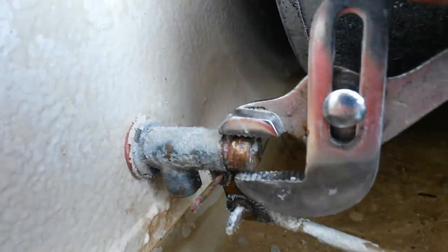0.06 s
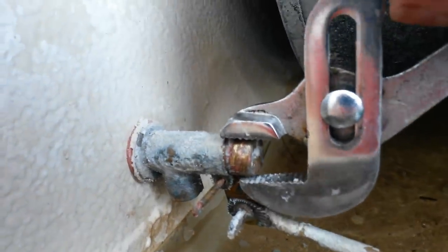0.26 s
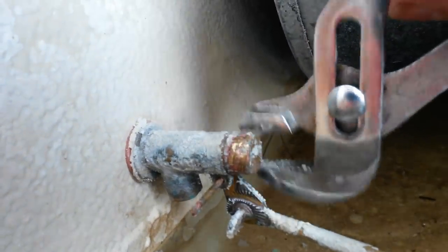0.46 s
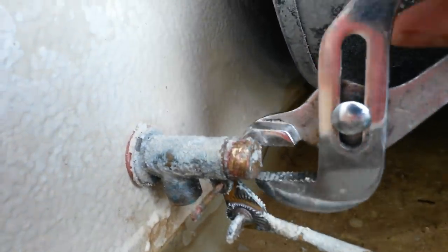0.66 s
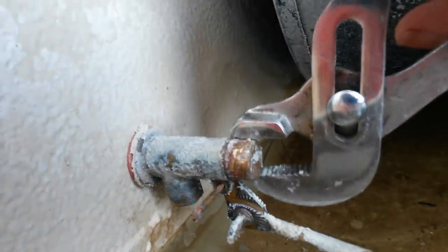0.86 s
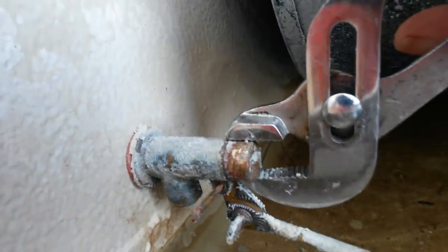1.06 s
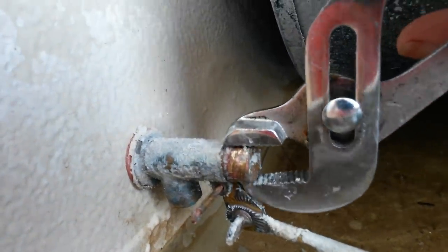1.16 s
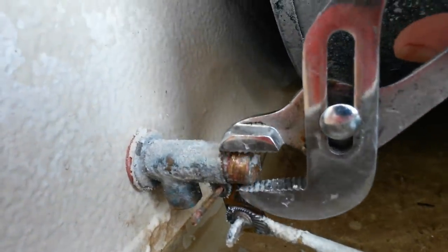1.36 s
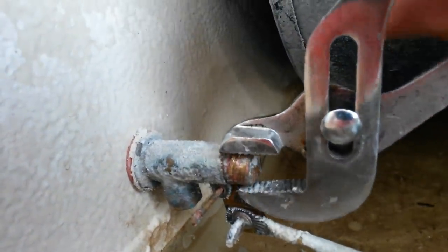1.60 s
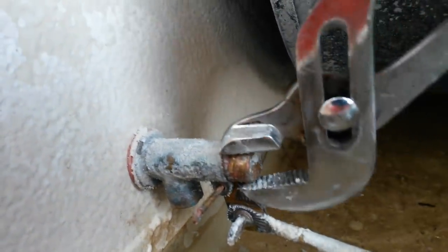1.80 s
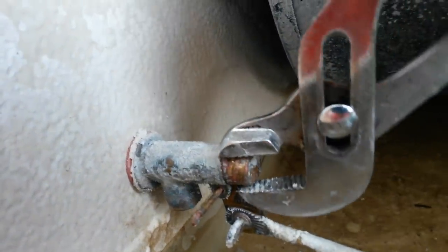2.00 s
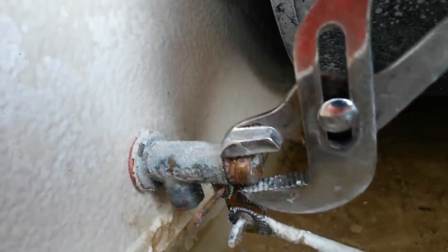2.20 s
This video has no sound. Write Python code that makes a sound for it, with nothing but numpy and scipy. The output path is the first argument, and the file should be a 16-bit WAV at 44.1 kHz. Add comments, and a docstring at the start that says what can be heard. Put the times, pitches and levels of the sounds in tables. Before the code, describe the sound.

Pliers knock on a corroded pipe fitting, close up. Light knocks at 0.2 and 0.4 seconds lead into a rumbling scrape, then two louder ringing clunks at 0.6 and 0.9 seconds, with a hollow boom. The teeth tick and grind over rust until about 1.6 seconds, ending in tiny squeaks. Duller knocks follow around 1.8 seconds, then a brief rumble. Low room noise lies underneath.

```python
"""Slip-joint pliers knock on a corroded pipe fitting, close up.
Each knock rings the steel, the pipe and the hollow body behind it, which booms on.
Between knocks the teeth tick, scrape and squeak over the rust; small slips under the grip
make the pipe judder and the body rumble. Low room noise and faint hiss lie underneath."""
import sys
import numpy as np
from scipy import signal
from scipy.fft import rfft, irfft, next_fast_len
from scipy.io import wavfile

SR = 44100
rng = np.random.default_rng(int(sys.argv[2]) if len(sys.argv) > 2 else 0)


def inscribe(sig):
    """Save sig as 16-bit PCM at rate SR to the path in sys.argv[1].

    A 1-D sig is mono; a 2-D sig holds one channel per row.
    Samples are clipped to [-1, 1] before scaling.
    """
    pcm = np.round(np.clip(np.atleast_2d(sig).T, -1, 1) * 32767)
    wavfile.write(sys.argv[1], SR, pcm.astype(np.int16))


N = 99225

# room noise: spectrum (f/Hz, gain/dB), envelope (t/s, level/dB)
ROOM_EQ = [(20, 1), (60, 23.5), (110, 27), (200, 13), (400, 10), (900, 2), (2000, -2.5), (3600, -3.5),
           (6500, -6.5), (10000, -6), (15000, -7)]
ROOM_ENV = [(0, -49), (.15, -57.5), (.35, -49.5), (1.2, -49.5), (1.7, -51), (2.25, -50)]
# modes of pipe with hollow body, and of the pliers (f/Hz, level/dB, t60/s, left minus right/dB)
PIPE_MODES = [(60.46, -42, 1, 3), (76.9, -52, 0.49, 4), (101.9, -40, 0.66, 1.5), (108.36, -26, 0.88, 0.5),
              (156.6, -32, 0.57, 5), (181.7, -24, 0.36, 1.5), (200.4, -35.5, 0.29, 6),
              (219.64, -30.5, 0.51, 0), (308.3, -24.5, 0.35, 0.5), (350.9, -32.5, 0.98, 2),
              (366, -43.5, 0.18, 0), (393.6, -22.5, 0.3, 1), (447.6, -33, 0.49, 12),
              (499.5, -29.5, 0.38, 6), (522, -34, 0.59, -1), (639, -33, .25, 10), (691.2, -28, 0.18, 2.5)]
PLIER_MODES = [(757, -35, .22, 0), (1102, -37, .17, 5), (1163, -34, .19, 4), (1258, -35, .16, 5),
               (1333, -30, .16, 8), (1469, -36, .14, 5), (1652, -29, .13, 7), (2042, -33, .11, 4),
               (2580, -29, .06, 2), (3380, -36, .035, 16), (3600, -35, .04, 16)]
# dense ring of tool and fitting (f/Hz, left gain/dB, right gain/dB)
RING_EQ = [(24.5, -26, -7), (51.6, 14.5, 11), (100, 33, 35), (137, 17.5, 20), (194, 33.5, 31.5),
           (240, 14, 21.5), (370, 23, 26.5), (610, 18.5, 22), (784, 16, 15.5), (1060, 15, 10.5),
           (1280, 21, 16), (1500, 5, -3), (1593, 17.5, -12.5), (1986, 4.5, 12), (1970, 17, 17),
           (2260, 9.5, -34), (2400, 6, 3), (2970, 1.5, -11.5), (3340, 7, -21), (3800, 3.5, -3),
           (4260, 4.5, -10), (5900, -7.5, -4), (8380, -16, -6.5), (10200, -36, 5), (11180, -19, -5.5),
           (14500, -27, -18)]
# its decay by band (f/Hz, early t60/s, late t60/s, late level/dB, rise/s, left-right correlation)
RING_DECAY = [(29.8, 0.13, .8, 9, .004, 0.94), (115, 0.095, 0.83, -26, 0.0014, 1),
              (302, 0.61, 0.29, -5, 0.024, 0.87), (610, 0.49, 0.18, 9, 0.0013, 1),
              (1204, 0.046, 0.24, -0.5, 0.0031, 0.53), (2220, 0.036, 0.26, -9.5, 0.0002, 0),
              (3700, 0.11, 0.24, -4, 0.00026, 0.23), (8400, 0.033, 0.17, -13.5, 0.0006, 0.61),
              (15800, 0.041, 0.089, -69, 0.000073, 0.35)]
# friction layers: slip envelope (t/s, level/dB), filter (f/Hz, gain/dB)
RUMBLE_ENV = [(0, -52), (.05, -73), (.19, -67), (.38, -48), (.47, -27.5), (.58, -36.5), (.7, -40.5),
              (.84, -47), (1.03, -33.5), (1.15, -49.5), (1.27, -37.5), (1.35, -55), (1.46, -54),
              (1.6, -49.5), (1.75, -51), (2, -51), (2.07, -35.5), (2.13, -66), (2.25, -56)]  # hollow body
RUMBLE_EQ = [(25, -7.5), (65, -7.5), (110, -8.5), (150, -13), (220, -13.5), (500, -53)]
JUDDER_ENV = [(0, -59), (.12, -78), (.38, -39), (.48, -34), (.56, -35.5), (.72, -42.5), (.84, -36),
              (1.02, -43), (1.24, -41), (1.309, -28.5), (1.47, -39), (1.58, -55), (1.752, -65), (2.25, -55)]  # pipe
JUDDER_EQ = [(40, -28.5), (110, -2.5), (180, 3), (215, 11.5), (260, 3.5), (320, -4.5), (400, -8),
             (900, -31.5)]
GRIND_ENV = [(0, -76), (.13, -68.5), (.35, -50), (0.422, -36.5), (.48, -31), (.54, -45), (.6, -50),
             (.69, -53), (0.803, -43.5), (0.833, -27.5), (.9, -35.5), (1.05, -42.5), (1.165, -50),
             (1.193, -39.5), (1.31, -41.5), (1.438, -39.5), (1.62, -68), (2.25, -92)]  # jaws
GRIND_EQ = [(60, -78), (180, -8), (330, -0.5), (520, 4), (800, 3), (1400, -7.5), (2500, -13.5),
            (5000, -7.5)]
GRIT_ENV = [(.04, -62.5), (.12, -72.5), (.33, -67), (.41, -57.5), (.475, -40), (.53, -72), (.75, -63.5),
            (.85, -49.5), (.92, -69), (.975, -48.5), (1.04, -57), (1.15, -95.5), (1.208, -49),
            (1.285, -47.5), (1.33, -58), (1.43, -51), (1.6, -62.5), (2.25, -77)]  # gritty treble
GRIT_EQ = [(300, -22), (1200, -21), (2600, -10.5), (3600, -7), (6000, -1.5), (10000, 0), (12500, 5.5),
           (14500, -1)]
# steel squeaking on the fitting (t/s, length/s, f/Hz, level/dB)
TOOTH_SQUEAKS = [(0.558, 0.037, 3750, -58.5), (1.519, 0.014, 3950, -52), (1.528, .014, 3600, -50.5),
                 (1.558, 0.007, 3550, -54), (1.645, 0.0093, 3710, -54), (1.68, 0.014, 3580, -54),
                 (2.08, 0.022, 4250, -60), (2.098, 0.018, 3700, -56.5), (2.172, 0.012, 3650, -57),
                 (2.19, 0.015, 3500, -56.5)]
# teeth ticking over rust (t/s, relative jaw ring level/dB, relative snap level/dB)
RUST_TICKS = [(0.2234, -18.5, -11.5), (0.287, -20, -38), (.295, -47, -18.5), (.436, -18, -26),
              (.447, -11.5, -24), (0.464, -20, -10), (.5, -18, -14.5), (0.835, -20.5, -36),
              (0.8669, -19, -14.5), (1.003, -43, -21), (1.068, -22.5, -19), (1.184, -24, -17),
              (1.205, -23.5, -12), (1.25, -40, -15), (1.274, -21.5, -10.5), (1.362, -18, -49),
              (1.399, -26, -25), (1.44, -18.5, -20), (1.489, -20, -17.5), (1.564, -24, -15.5),
              (2.178, -39, -19.5)]
# knock bands (f/Hz); jaw knocks (t/s, then gain/dB per band)
KNOCK_BANDS_HZ = [100, 190, 290, 400, 650, 880, 1200, 2000, 2550, 3500, 10000]
JAW_KNOCKS = [(0.2315, -14, -4.5, -22.5, -12, -3, -14.5, -8, -15.5, -8.5, -2, -3),
              (0.374, -11.5, -21, -27, -18.5, -5, -23, -25.5, -28, -21, -17.5, -15),
              (.612, -11.5, 2, -1.5, -3, -1, 3.5, -0.5, -5.5, 8.5, 3.5, -4.5),
              (0.6159, -48, -12, -2.5, -12, -2, 0.5, 4.5, -17.5, -33, -11, -14.5),
              (0.8944, 4, 0.5, 0.5, 3, 2.5, 1, 5.5, 6.5, 3, 5.5, 1),
              (.985, -12.5, -0.5, -1.5, -19, -12.5, -13.5, -9.5, -21.5, -22, -24, -13.5),
              (1.779, -10.5, -20.5, -30, -21.5, -19, -30, -28.5, -27, -26, -20, -17.5),
              (1.8232, 5, -2, -16, -20.5, -1.5, -18.5, -17.5, -23, -19.5, -17, -15.5),
              (1.931, -3.5, -7, -19.5, -30.5, -23, -31, -29.5, -54, -41, -37, -18.5)]


def amp(db):
    """dB to gain."""
    return 10 ** (np.asarray(db) / 20)


def unit_rms(x):
    """Scale to rms 1."""
    return x / np.sqrt(np.mean(x ** 2) + 1e-20)


def log_interp(points, hz):
    """Interpolate (f/Hz, value) over log frequency."""
    f, value = np.transpose(points)
    return np.interp(np.log(hz + 1), np.log(f + 1), value)


def envelope(points):
    """(t/s, level/dB) to gain per sample."""
    return amp(np.interp(np.arange(N) / SR, *np.transpose(points)))


def add(mix, start_s, sound):
    """Mix in a stereo sound."""
    part = mix[:, max(round(start_s * SR), 0):][:, :sound.shape[1]]
    part += sound[:, :part.shape[1]]


def equalise(x, eq, size=8192):
    """Minimum-phase filter from (f/Hz, gain/dB)."""
    log_gain = np.log(amp(log_interp(eq, abs(np.fft.fftfreq(size, 1 / SR)))))
    taps = np.fft.ifft(np.exp(np.conj(signal.hilbert(log_gain)))).real[:size // 2]
    return signal.fftconvolve(x, taps if x.ndim == 1 else taps[None], axes=-1)[..., :x.shape[-1]]


def room_noise(mono_below_hz=500):
    """Low rumble, alike in both ears, and faint hiss."""
    left, other = rfft(rng.standard_normal((2, N)))
    corr = 1 / (1 + (np.fft.rfftfreq(N, 1 / SR) / mono_below_hz) ** 2)
    right = corr * left + np.sqrt(1 - corr ** 2) * other
    return unit_rms(equalise(irfft([left, right], N), ROOM_EQ)) * envelope(ROOM_ENV)


def modal_ring(modes, t, phases_cycles):
    """Damped sines, each swelling over its first cycles."""
    out = np.zeros((2, len(t)))
    for (hz, db, t60_s, pan_db), phase in zip(modes, phases_cycles):
        decay = amp(db - 60 * t / t60_s + np.array([[pan_db], [-pan_db]]) / 2)
        attack = 1 - np.exp(-t * hz)
        out += decay * attack * np.sin(2 * np.pi * (hz * t + phase))
    return out


def dense_ring(count, t):
    """Crowded modes of tool and fitting: two-slope decaying noise bands, new for each contact spot."""
    size = len(t)
    hz, centres_hz = np.fft.rfftfreq(size, 1 / SR), [row[0] for row in RING_DECAY]
    spectrum = rfft(rng.standard_normal((count, 2, size)))
    ring = np.zeros((count, 2, size))
    for one_hot, (_, early_s, late_s, late_db, rise_s, corr) in zip(np.eye(len(RING_DECAY)), RING_DECAY):
        band_power = log_interp(list(zip(centres_hz, one_hot)), hz)
        band = irfft(spectrum * np.sqrt(band_power), size)
        band[:, 1] = corr * band[:, 0] + np.sqrt(1 - corr ** 2) * band[:, 1]
        decay = amp(-60 * t / early_s) + amp(late_db - 60 * t / late_s)
        shape = decay * (1 - np.exp(-t / rise_s))
        ring += band * shape / np.linalg.norm(shape)
        spectrum = spectrum * 1j  # quadrature: adjacent bands add in power
    eq = np.array(RING_EQ)
    return np.stack([equalise(ring[:, 0], eq[:, [0, 1]]), equalise(ring[:, 1], eq[:, [0, 2]])], axis=1)


def metal_responses(count, length_s=1.0):
    """One impulse response per contact spot: shared modes plus its own dense ring."""
    t = np.arange(next_fast_len(int(length_s * SR))) / SR
    dense = dense_ring(count, t)
    pipe = modal_ring(PIPE_MODES, t, np.zeros(len(PIPE_MODES)))
    pliers = modal_ring(PLIER_MODES, t, rng.random((len(PLIER_MODES), 2, 1)))
    return pipe + pliers + dense


def friction(response, env, eq, slips_per_s, spread_db):
    """Many small, randomly timed slips drive the metal."""
    slips = (rng.random(N) < slips_per_s / SR) * rng.choice([-1, 1], N)
    sizes = amp(spread_db * np.minimum(rng.exponential(1, N), 4))
    force = unit_rms(slips * sizes) * envelope(env)
    ring = equalise(response, eq)
    ring /= np.sqrt((ring ** 2).sum() / 2)
    return signal.fftconvolve(force[None], ring, axes=1)[:, :N]


def tooth_squeaks(width_hz=260, right_db=-14):
    """A sliding tooth briefly drives one narrow jaw resonance."""
    out = np.zeros((2, N))
    pole = np.exp(-np.pi * width_hz / SR)
    for start_s, length_s, hz, db in TOOTH_SQUEAKS:
        t = np.arange(0, 3 * length_s, 1 / SR)
        waver = signal.lfilter([1], [1, -pole], rng.standard_normal(len(t)))
        swell = 2 * t / length_s * np.exp(1 - 2 * t / length_s)
        tone = unit_rms(waver * np.cos(2 * np.pi * hz * t)) * swell
        add(out, start_s, amp(db) * np.array([tone, amp(right_db) * tone]))
    return out


def rust_ticks(responses, crumble_s=0.0018, crumble_db=-17, gain_db=2):
    """A tooth snaps over a rust flake, which crumbles briefly; the spot changes each tick."""
    out, t = np.zeros((2, N)), np.arange(SR // 50) / SR
    for k, (start_s, jaw_db, snap_db) in enumerate(RUST_TICKS):
        crumble = amp(crumble_db) * rng.standard_normal(len(t)) * np.exp(-t / crumble_s)
        force = signal.unit_impulse(len(t)) + crumble
        response = responses[k % len(responses)][:, :SR // 2]
        tick = signal.fftconvolve(response, force[None] / np.linalg.norm(force), axes=1)
        eq = [(150, jaw_db - 14), (2200, jaw_db - 11), (3500, jaw_db), (9500, snap_db)]
        add(out, start_s, equalise(tick, eq))
    return amp(gain_db) * out


def jaw_knocks(responses):
    """The jaws strike the fitting; each knock has its own tone colour, set band by band."""
    out = np.zeros((2, N))
    for (start_s, *gains_db), response in zip(JAW_KNOCKS, responses):
        add(out, start_s, equalise(response, list(zip(KNOCK_BANDS_HZ, gains_db))))
    return out


def scene():
    """Knocks, ticks and friction ring the same metal; squeaks and room noise add to it."""
    rubbed, *struck = metal_responses(count=len(JAW_KNOCKS) + 1)
    rumble = friction(rubbed, RUMBLE_ENV, RUMBLE_EQ, slips_per_s=240, spread_db=3.14)
    judder = friction(rubbed, JUDDER_ENV, JUDDER_EQ, slips_per_s=550, spread_db=0)
    grind = friction(rubbed, GRIND_ENV, GRIND_EQ, slips_per_s=600, spread_db=3)
    grit = friction(rubbed, GRIT_ENV, GRIT_EQ, slips_per_s=1100, spread_db=3.5)
    rubbing = rumble + judder + grind + grit
    return jaw_knocks(struck) + rust_ticks(struck) + tooth_squeaks() + rubbing + room_noise()


def record(dry, cutoff_hz=14650):
    """Steep low-pass."""
    taps = signal.firwin(255, cutoff_hz, window=("kaiser", 9), fs=SR)
    return signal.oaconvolve(dry, taps[None], "same")


dry = scene()
out = record(dry)
inscribe(out)
```